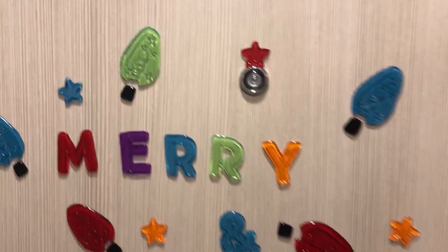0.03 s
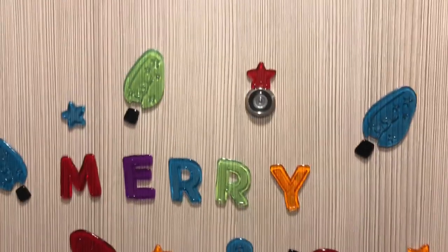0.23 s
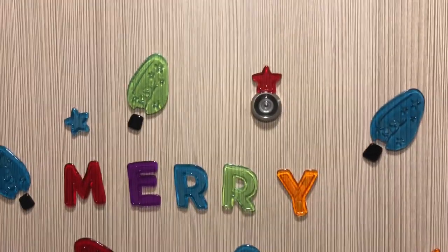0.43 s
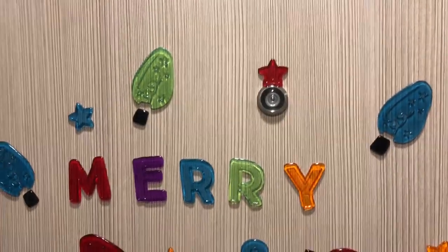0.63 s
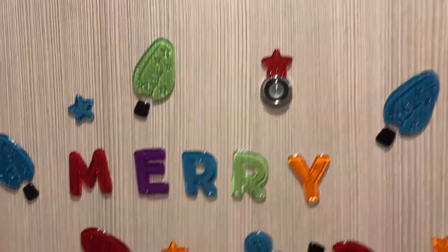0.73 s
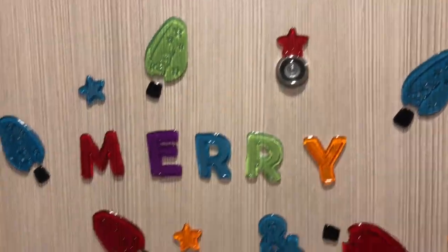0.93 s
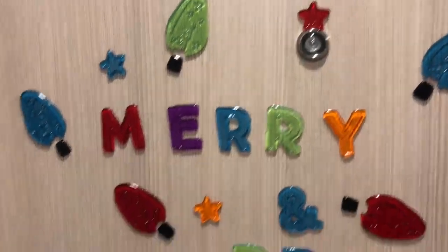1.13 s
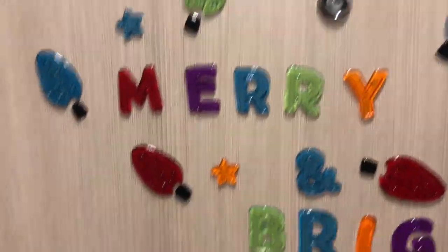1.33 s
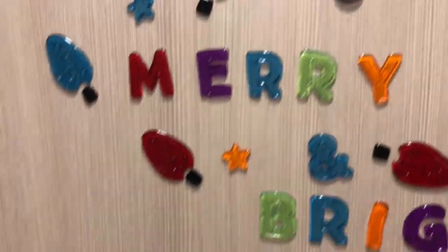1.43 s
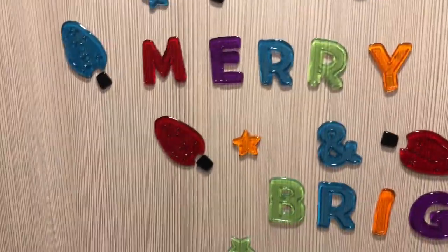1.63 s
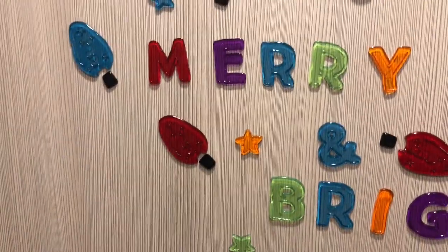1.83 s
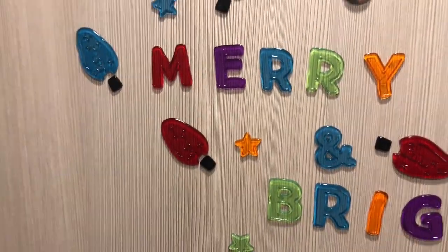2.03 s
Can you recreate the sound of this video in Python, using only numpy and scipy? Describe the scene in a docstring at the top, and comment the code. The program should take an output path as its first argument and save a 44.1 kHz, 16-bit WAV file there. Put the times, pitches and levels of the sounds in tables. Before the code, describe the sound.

Knuckles knock five times, quickly and evenly, on a wooden door. After a pause the handle rubs faintly and the latch lets go with a loud clunk. The corridor echoes briefly over a low rush of ventilation.

```python
"""Knocking on a corridor door

Knuckles rap five times on a wooden door, over low ventilation. Each rap sends the same bending
wave through the panel, which rings on in the corridor. Something brushes softly among the raps.
Faint taps follow and the handle rubs as it turns; then the latch grinds back and lets go with a
loud clunk that jolts the door."""
import sys
import numpy as np
from scipy import signal
from scipy.fft import rfft, irfft
from scipy.io import wavfile
from scipy.ndimage import uniform_filter1d

SR = 44100
rng = np.random.default_rng(int(sys.argv[2]) if len(sys.argv) > 2 else 0)


def transcribe(signal):
    """Save signal, clipped to [-1, 1], as a 16-bit WAV file at the path in sys.argv[1]."""
    frames = np.atleast_2d(signal).T
    limited = np.clip(frames, -1, 1)
    pcm = np.round(limited * 32767).astype(np.int16)
    wavfile.write(sys.argv[1], SR, pcm)


N = 91375
T, HZ = np.arange(N) / SR, np.fft.rfftfreq(2 * N, 1 / SR)


def amp(db):
    """Decibels to gain."""
    return 10 ** (np.asarray(db) / 20)


def read(points, hz):
    """Interpolates a table on a log-frequency axis."""
    table_hz, value = np.transpose(points)
    return np.interp(np.log(hz + 1), np.log(table_hz + 1), value)


def causal(db):
    """Minimum-phase response with the given gain curve."""
    log_gain = np.log(amp(db))
    mirrored = np.r_[log_gain, log_gain[-2:0:-1]]
    return np.exp(np.conj(signal.hilbert(mirrored)))[:N + 1]


def through(x, response):
    """Filters by a frequency response."""
    return irfft(rfft(x, 2 * N) * response)[:N]


def colour(x, spectrum):
    """Filters by a table of Hz and dB."""
    return through(x, causal(read(spectrum, HZ)))


def convolve(x, response):
    """Plays x through an impulse response."""
    return signal.fftconvolve(x, response)[:N]


def click(start_s, db=0):
    """One impulse."""
    return amp(db) * (np.arange(N) == round(start_s * SR))


def decay(t60_s, t=T):
    """Exponential fall, 60 dB in t60_s."""
    return np.exp(-np.log(1000) * t / np.maximum(t60_s, 1e-3))


def ring(modes):
    """Decaying sines, radiated with alternating sign."""
    return sum((-1) ** k * amp(db) * decay(t60_s) * np.sin(2 * np.pi * hz * T)
               for k, (hz, db, t60_s) in enumerate(modes))


def crack(t60_s, rise_s=1e-4):
    """Dense, quickly dying modes with an even spectrum and unit energy."""
    envelope = decay(t60_s) * np.minimum(T / rise_s, 1)
    burst = rng.standard_normal(N) * envelope
    for _ in range(3):
        spectrum = rfft(burst, 2 * N)
        whitened = irfft(spectrum / (abs(spectrum) + 1e-12))[:N]
        burst = whitened * np.minimum(2 * envelope, 1)
    return burst / np.linalg.norm(burst)


def bending_wave(start_s, travel_1khz_s, fastest_hz=16000):
    """An impulse after crossing the panel: the lows lag behind the fastest treble."""
    lag_cycles = travel_1khz_s * np.sqrt(1000 * HZ) * (2 - np.sqrt(np.minimum(HZ / fastest_hz, 1)))
    return through(click(start_s), np.exp(-2j * np.pi * lag_cycles))


# Each row: frequency in Hz, level in dB.
AIR_SPECTRUM = [(20, -68), (45, -40.5), (78, -29.5), (150, -30), (300, -39), (600, -47), (1100, -52),
                (2200, -60.5), (4500, -66.5), (7500, -68.5), (11000, -74), (16000, -78)]


def ventilation(whine_hz=7800, half_width_hz=62, whine_db=-66.5):
    """Low steady rush with a thin whine."""
    whine = amp(whine_db) / (1 + ((HZ - whine_hz) / half_width_hz) ** 2)
    return through(rng.standard_normal(N), amp(read(AIR_SPECTRUM, HZ)) + whine)


# Each row: frequency in Hz, T60 in seconds.
CORRIDOR_DECAY = [(80, .7), (250, .55), (700, .55), (1400, .42), (2500, .31), (6000, .25), (14000, .15)]


def corridor(rise_s=0.0095):
    """Diffuse tail of unit energy; the treble dies first."""
    hz, t, noise = signal.stft(rng.standard_normal(N), SR, nperseg=512)
    t60_s = read(CORRIDOR_DECAY, hz)[:, None]
    tail = signal.istft(noise * decay(t60_s, t), SR)[1][:N]
    tail *= np.minimum(T / rise_s, 1) ** 2
    power = uniform_filter1d(abs(rfft(tail, 2 * N)) ** 2, size=600)
    return through(tail, 1 / np.sqrt(power))


# Each row: frequency in Hz, level in dB.
BRUSH_SPECTRUM = [(300, -63), (1500, -38), (3000, -42.5), (4500, -41), (7000, -45.5), (10000, -53.5),
                  (16000, -66)]


def brush(room, start_s=0.23, peak_s=0.26, end_s=0.28, grain_db=3, room_db=-6.5):
    """A short grainy swish, perhaps a sleeve, that swells and stops."""
    swell_db = np.interp(T, [start_s, peak_s, end_s], [-9.5, 0, -12.5])
    grains = rng.standard_normal(N) * amp(swell_db + grain_db * rng.standard_normal(N))
    swish = colour(grains * (T > start_s) * (T < end_s), BRUSH_SPECTRUM)
    return swish + amp(room_db) * convolve(swish, room)


# Hand friction on the handle. Each row: frequency in Hz, level in dB.
GRIP_SPECTRUM = [(100, -66), (450, -53), (900, -55), (1600, -64), (3000, -73), (8000, -90)]


def handle_rub(grip_s=1.5, turn_s=(1.6, 1.92), glide_hz=(1060, 1290), half_width_hz=110, rub_db=-41.5):
    """Dull friction of the grip, and one resonance that rises as the handle turns."""
    turn = np.interp(T, turn_s, [0, 1])
    phase = 2 * np.pi * np.cumsum(np.interp(T, turn_s, glide_hz)) / SR
    friction = through(rng.standard_normal(N), 1 / (1 + (HZ / half_width_hz) ** 2))
    resonance = 2 * friction * np.cos(phase)
    swell = np.sqrt(abs(np.sin(np.pi * turn)))
    grip = colour(rng.standard_normal(N) * (T > grip_s), GRIP_SPECTRUM)
    return grip + amp(rub_db) * swell * resonance


# Each row: start in seconds, level in dB, centre in Hz, half-width in octaves.
FAINT_TAPS = [(1.061, -28, 6500, 0.28), (1.063, -27.5, 1980, 1.07), (1.386, -22.5, 2160, 0.71),
              (1.3845, -10, 540, .35), (1.386, -2, 930, 0.38), (1.411, -27.5, 5900, 0.64),
              (1.412, -15, 1300, .8), (1.759, -30, 3880, 0.71), (1.777, -32.5, 4970, 0.66),
              (1.896, -10, 650, .9), (1.906, -12, 2500, 0.67), (1.912, -11.5, 915, 1.4),
              (1.920, -9, 1490, 0.41)]


def taps(room, t60_s=0.074, room_db=-3.5):
    """Small contacts at the door and its handle."""
    out = np.zeros(N)
    for start_s, db, centre_hz, octaves in FAINT_TAPS:
        band_db = -20 * np.log10(1 + (np.log2((HZ + 1) / centre_hz) / octaves) ** 4)
        contact = convolve(click(start_s, db), crack(t60_s))
        out += through(contact, causal(band_db))
    return out + amp(room_db) * convolve(out, room)


# Each row: start in seconds, level in dB.
BOLT_CATCHES = [(1.9283, -15), (1.9305, 0), (1.9525, -1), (1.962, -1.5), (1.981, 2)]


def stick_slip(start_s=1.929, end_s=1.989, slips_per_s=1000, slip_db=-10, spread_db=4):
    """Force of the sliding bolt: a few hard catches among many small, uneven slips."""
    times_s = np.arange(start_s, end_s, 1 / slips_per_s)
    force = sum(click(catch_s, db) for catch_s, db in BOLT_CATCHES)
    for slip_s, (jitter, size) in zip(times_s, rng.standard_normal((len(times_s), 2))):
        force += np.sign(jitter) * click(slip_s + 0.5 * jitter / slips_per_s, slip_db + spread_db * size)
    return force


# Lock and handle. Each row: frequency in Hz, level in dB, T60 in seconds.
LOCK_MODES = [(957, -4, 0.19), (1014, -6.5, 0.49), (1029, 3, .25), (1236, 5, 0.13), (1546, 6, 0.08),
              (1804, 2, 0.14), (2525, -4, 0.095), (2866, -3, 0.043), (2866, 8.5, 0.076), (4240, -20, 0.053),
              (5200, -4, 0.084), (6760, -18, .1), (8730, -13, .05), (9400, -10, .07)]
# Sliding metal, clunk and the corridor's answer to both. Each row: frequency in Hz, gain in dB.
SLIDE_SPECTRUM = [(25, -50), (45, -13), (80, 2), (400, 0.5), (1000, 4.5), (1300, 0), (1750, 7),
                  (2200, -1.5), (2900, 8), (3500, 0), (4200, 0), (6500, -4.5), (8500, 1), (9400, 1),
                  (10200, -8), (11100, -5), (12400, -14.5), (16000, -20)]
CLUNK_SPECTRUM = [(25, -37), (100, 9.5), (450, 16.5), (750, 12), (1100, 25), (1350, 16.5), (1580, 23),
                  (2150, 12), (2780, 25.5), (3200, 13), (5000, 12.5), (7000, 9.5), (9000, 12.5),
                  (11200, 10.5), (12400, 2.5), (16000, -4)]
LATCH_ROOM_SPECTRUM = [(80, 6.5), (400, 4), (1000, -3), (1700, -4.5), (2700, -10.5), (4000, -4),
                       (6000, -2.5), (9000, -7), (15000, -5)]


def latch(room, clunk_s=1.9911, slide_ring_db=-47.5, clunk_ring_db=-26, room_db=-5.5):
    """The bolt grinds back, then snaps free; both ring the lock."""
    lock = ring(LOCK_MODES)
    slips = stick_slip()
    scrape = colour(crack(t60_s=0.0173), SLIDE_SPECTRUM)
    slide = convolve(slips, scrape + amp(slide_ring_db) * lock)
    snap = bending_wave(clunk_s, travel_1khz_s=0.001987)
    impact = colour(crack(t60_s=0.072, rise_s=0.00084), CLUNK_SPECTRUM)
    clunk = convolve(snap, impact + amp(clunk_ring_db) * lock)
    direct = slide + clunk
    return direct + amp(room_db) * convolve(direct, colour(room, LATCH_ROOM_SPECTRUM))


# Each row: frequency in Hz, level in dB.
JOLT_SPECTRUM = [(25, -49), (45, -5), (70, 24.5), (130, 17.5), (250, -2.5), (500, 11.5), (1000, 5.5),
                 (2500, -7)]


def jolt(start_s=1.998):
    """Low push as the door jolts in its frame."""
    return colour(click(start_s), JOLT_SPECTRUM)


# The panel's first wave and the corridor's answer. Each row: frequency in Hz, gain in dB.
PANEL_SPECTRUM = [(30, -16.5), (70, -1), (140, 1), (255, 2.5), (335, -3), (500, 1), (900, 1), (1300, -1),
                  (2200, 0), (4000, -4.5), (15000, -16)]
DOOR_ROOM_SPECTRUM = [(30, -5), (80, -2), (250, 1.5), (500, 1), (850, -0.5), (1400, -8), (2500, -11),
                      (8000, -25.5)]
# Each row: delay in seconds, linear gain.
EDGE_ECHOES = [(.0064, 0.72), (.0095, 0.37), (.0133, .08), (0.02, 0.1), (0.024, .12)]
# Each row: frequency in Hz, level in dB, T60 in seconds.
PANEL_MODES = [(78.5, -20.5, 0.75), (125, -18.5, 0.31), (185.4, -1, 0.48), (236.8, 3.5, 0.27),
               (345.3, -0.5, 0.46), (401, -14, .35), (432.8, -3, 0.29), (549, -24, 0.41), (672, -3, 0.25),
               (745.5, -5, 0.56), (816, -17.5, 0.43), (883, -13, 0.46), (1077, -28, 0.27),
               (1143, -12, 0.11), (1193, 3, 0.12)]


def door(room, echo_cutoff_hz=2310, scatter_db=-4, modes_db=-45.5):
    """Response to a blow: a falling chirp, edge echoes, scattered waves, panel modes and the corridor."""
    echoes = sum(gain * np.exp(-2j * np.pi * HZ * delay_s) for delay_s, gain in EDGE_ECHOES)
    echoes *= -1j / (1 + (HZ / echo_cutoff_hz) ** 4)  # turned a quarter cycle and dulled
    wave = bending_wave(0, travel_1khz_s=0.002524)
    first_wave = colour(wave, PANEL_SPECTRUM)
    scattered = amp(scatter_db) * convolve(first_wave, crack(t60_s=0.035, rise_s=0.0017))
    ringing = amp(modes_db) * convolve(wave, ring(PANEL_MODES))
    reverb = convolve(wave, colour(room, DOOR_ROOM_SPECTRUM))
    return through(first_wave, 1 + echoes) + scattered + ringing + reverb


# Each row: start in seconds, relative level in dB, low-pass corner in Hz.
KNUCKLE_RAPS = [(0.1776, -3.5, 1087), (0.3802, -3.5, 1184), (0.57, -1.7, 1520), (0.7426, -0.94, 1680),
                (.9175, -0.5, 1780)]


def knuckles(force_db=8.5, lowpass_order=4.8, skin_db=-30.5, skin_db_per_db=2.1):
    """Soft pushes, brighter when harder, each with a faint tick of skin that grows faster than the rap."""
    force = np.zeros(N)
    for start_s, db, corner_hz in KNUCKLE_RAPS:
        blow = click(start_s, db + force_db)
        force += through(blow, 1 / np.sqrt(1 + (HZ / corner_hz) ** (2 * lowpass_order)))
        force += amp(skin_db + skin_db_per_db * db) * convolve(blow, crack(t60_s=0.042))
    return force


def scene():
    """Mono mix; the raps and the latch's jolt drive the same door."""
    room = corridor()
    blows = knuckles() + jolt()
    air = ventilation()
    knocks = convolve(blows, door(room))
    return (air + knocks + brush(room) + taps(room) + handle_rub() + latch(room))[None]


def record(dry):
    """Brief silence, a quick fade-in and a low-pass."""
    start_s, fade_s, cutoff_hz = 0.085, 0.047, 15900
    faded = dry * np.clip((T - start_s) / fade_s, 0, 1)
    lowpass = signal.firwin(511, cutoff_hz, window=("kaiser", 9), fs=SR)
    return signal.oaconvolve(faded, lowpass[None], "same")


dry = scene()
out = record(dry)
transcribe(out)
```